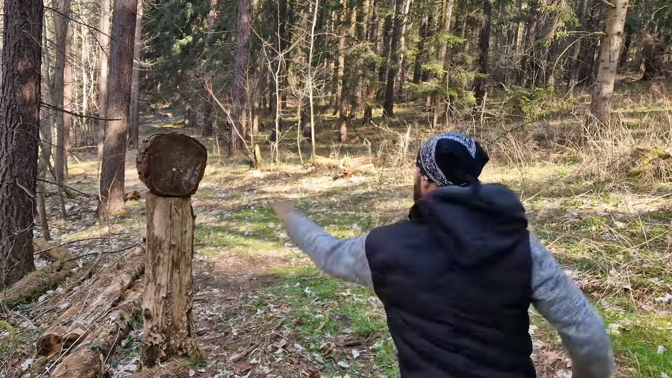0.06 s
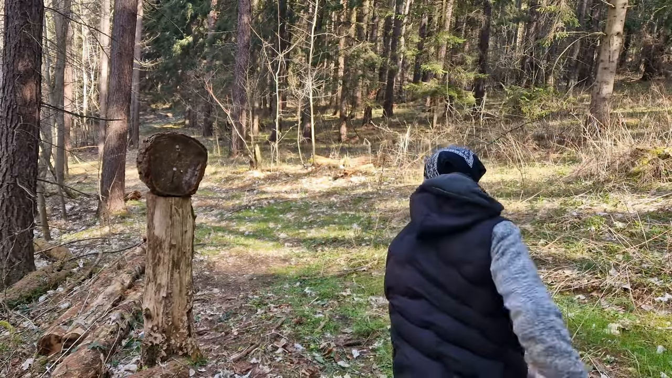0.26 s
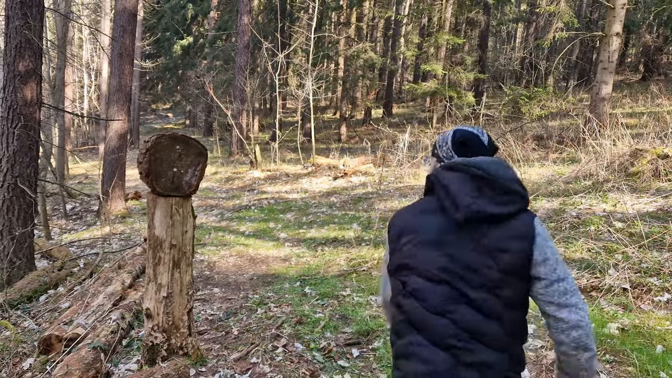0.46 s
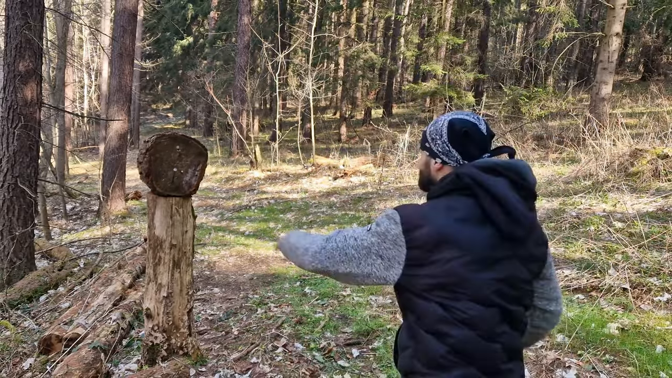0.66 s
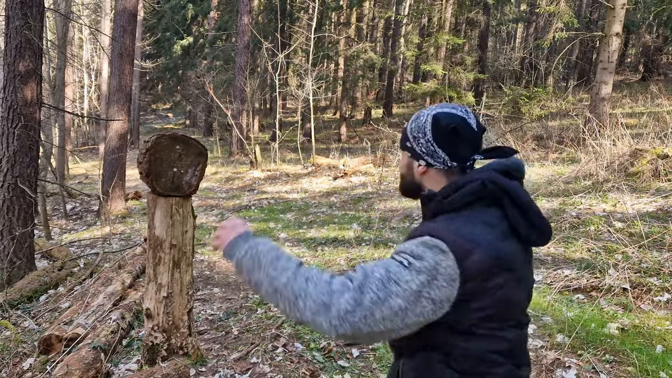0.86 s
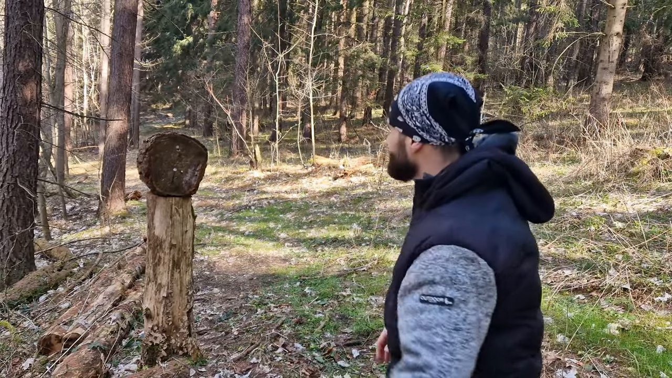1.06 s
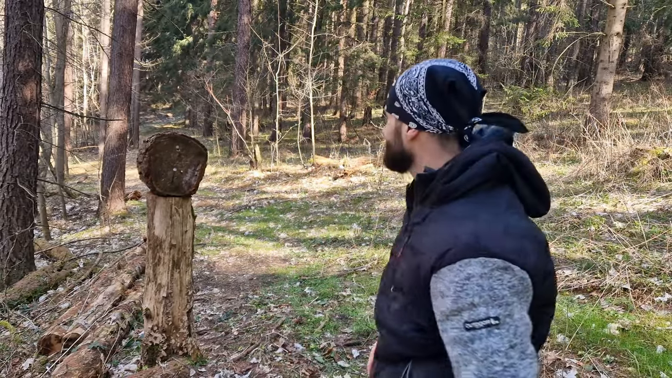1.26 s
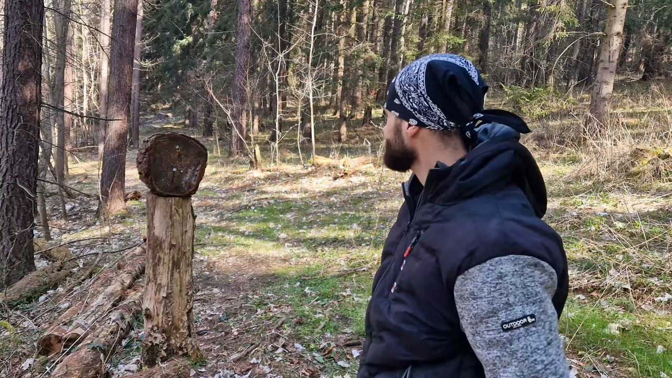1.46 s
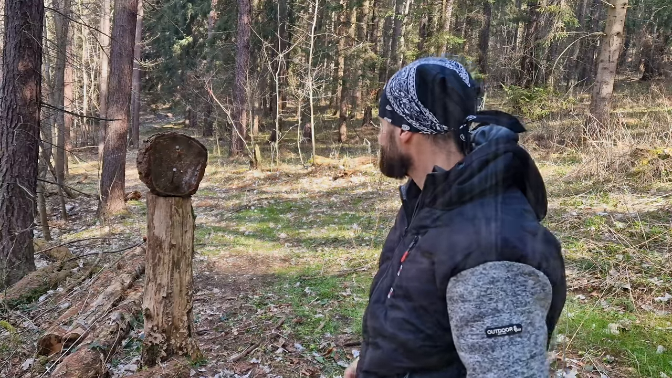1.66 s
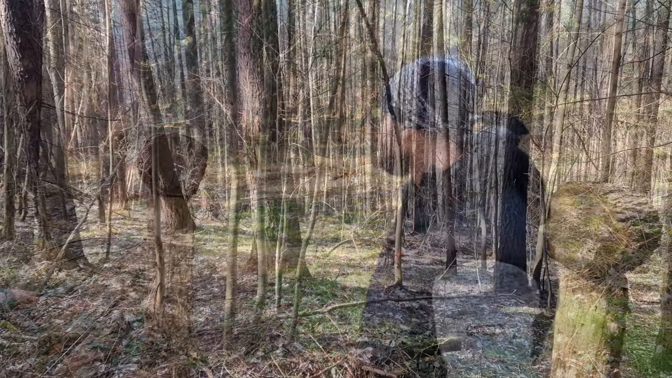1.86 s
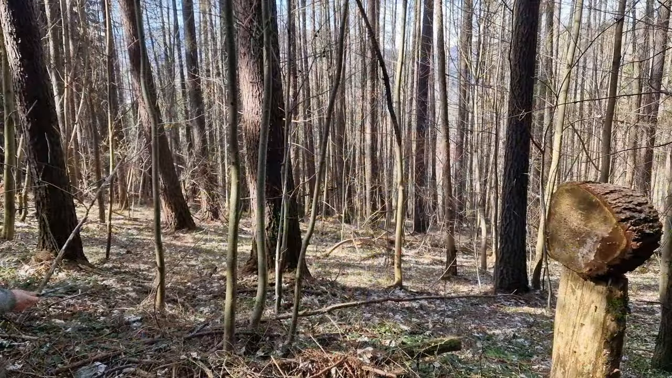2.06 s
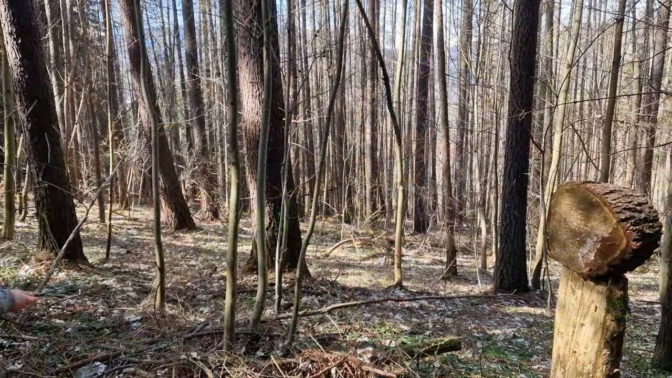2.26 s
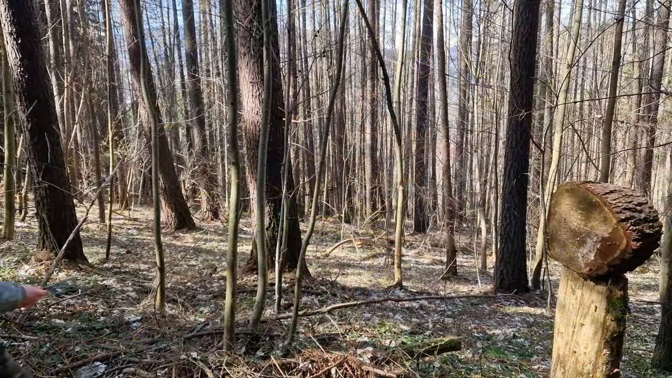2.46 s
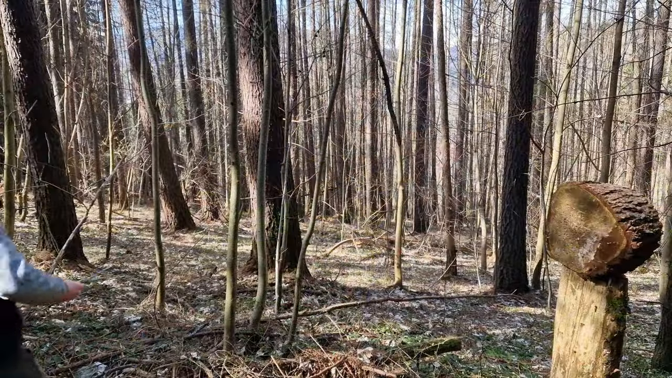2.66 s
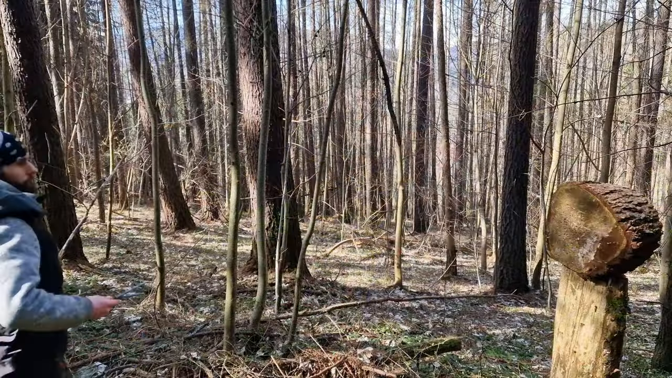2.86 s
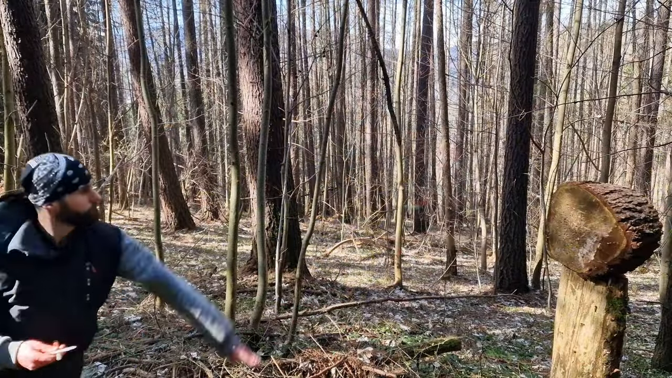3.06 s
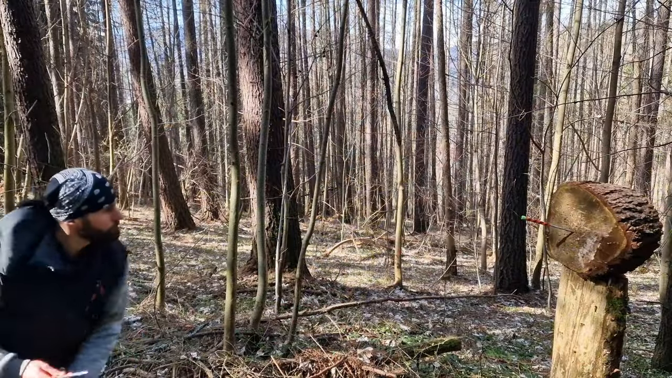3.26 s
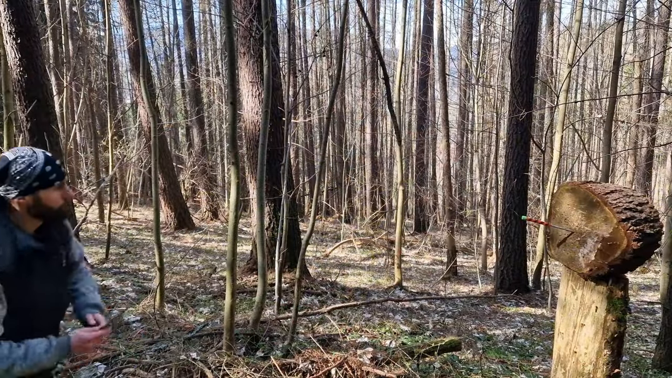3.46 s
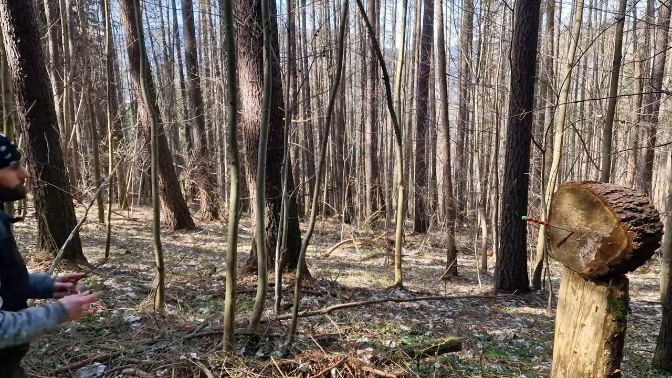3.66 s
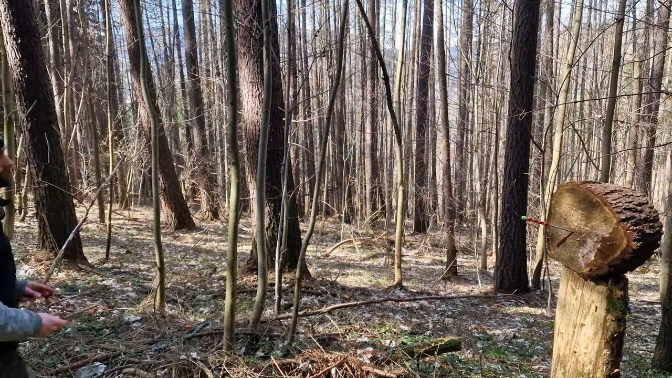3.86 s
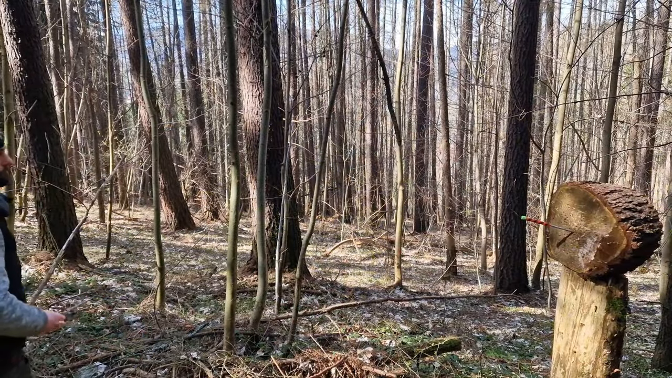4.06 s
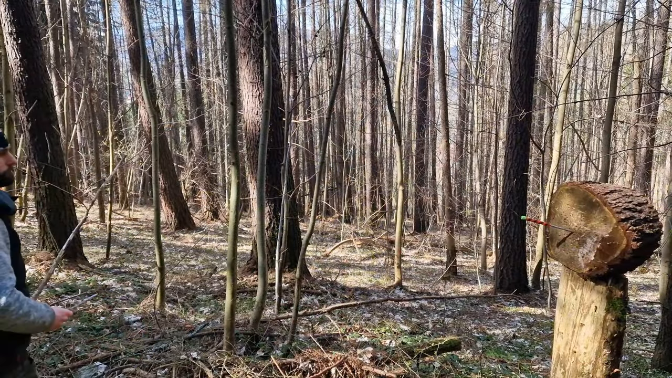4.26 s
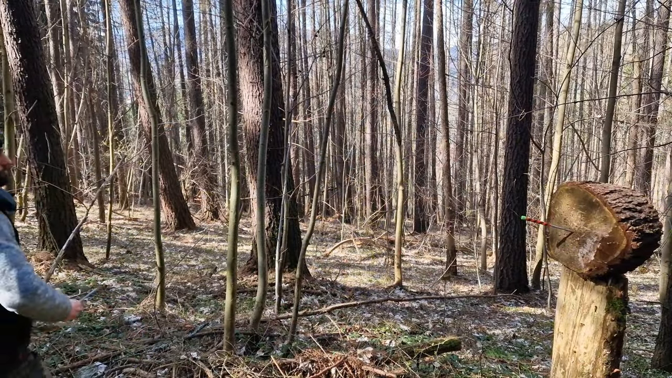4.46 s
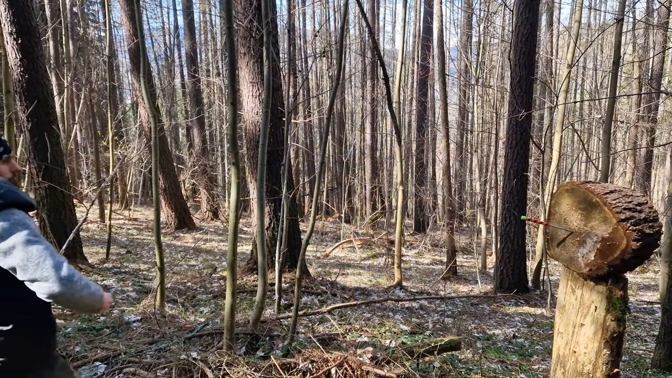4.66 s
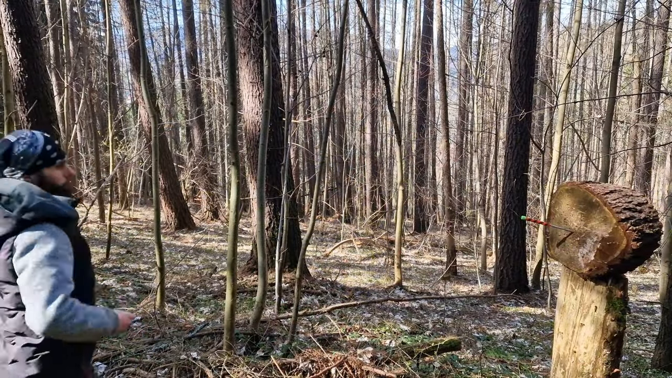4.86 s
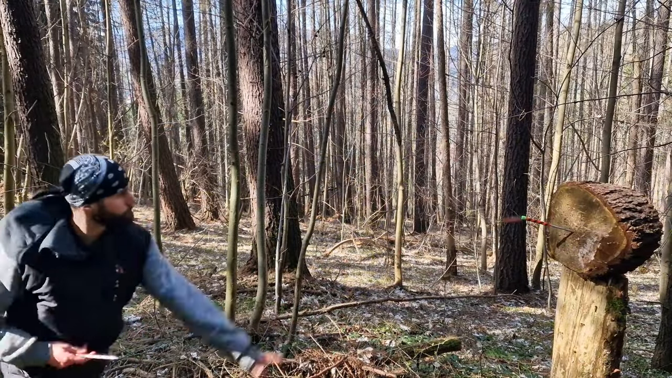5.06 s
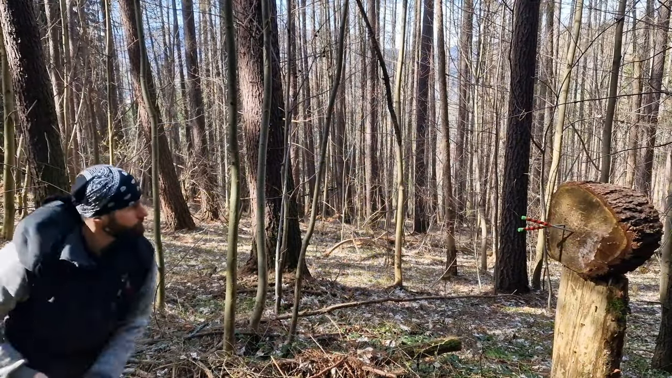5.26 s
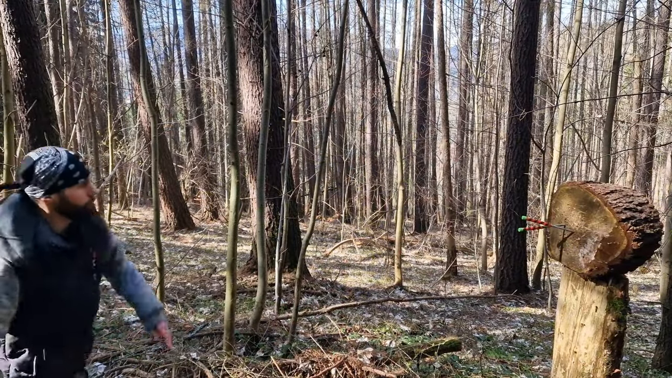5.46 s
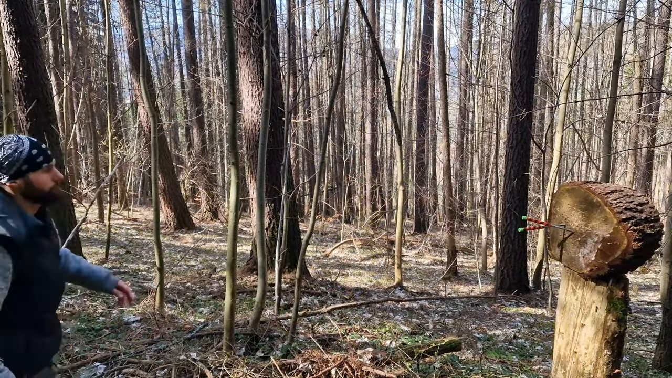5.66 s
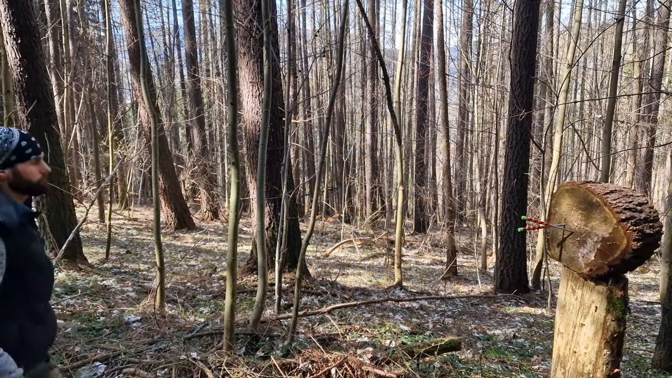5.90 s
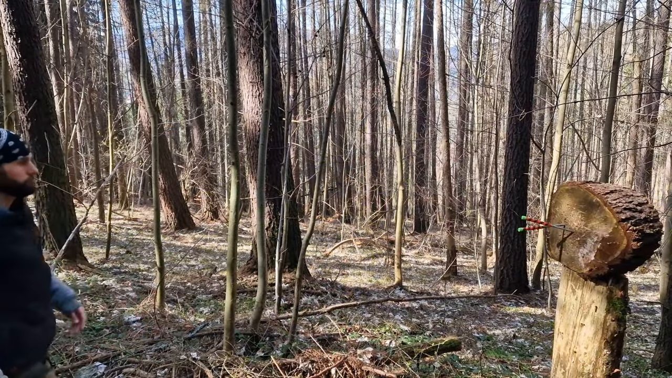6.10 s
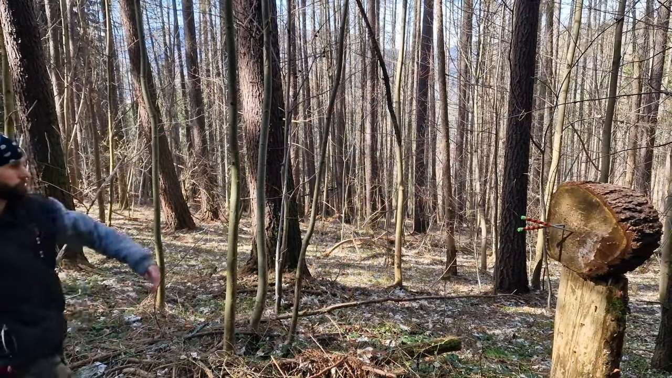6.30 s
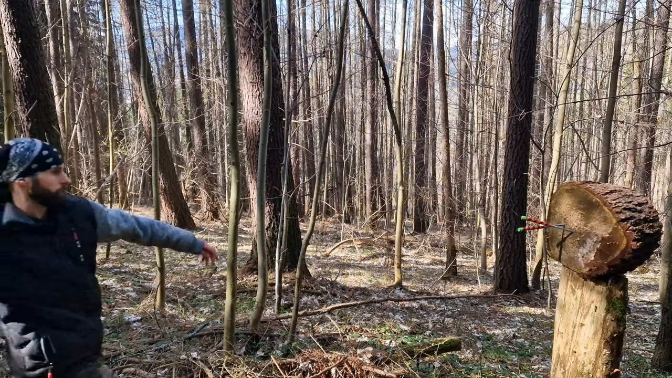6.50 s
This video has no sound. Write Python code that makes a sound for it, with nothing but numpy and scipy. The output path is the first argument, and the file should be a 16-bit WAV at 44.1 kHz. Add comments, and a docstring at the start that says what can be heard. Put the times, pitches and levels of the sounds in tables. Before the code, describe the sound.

In a quiet forest, someone close to the microphone throws three nails into a wooden target. Each lands with a crunchy thud, a tiny clink and a short echo, the first right away and the others after a pause. Between hits come rustling clothes, steps on leaves, snapping twigs and a couple of dull heel thumps. Soft wind rumble and faint, high bird calls lie underneath.

```python
"""Low wind rumbles through a forest while dry leaves stir and a far flock twitters. A thrower's padded vest
swishes, and at 0.2 s his sharpened nail bites into a log on a post: it thuds and echoes among the trunks. He
steps on leaves and twigs, and from 1.5 s small birds whistle and chirp. At 2.1 s the soft background hiss and
the high, flickering hiss drop abruptly. A second nail hits at 3.2 s and a third at 5.1 s, with two slow bird
notes between them. Near the end his heel thumps and one high call flicks up and falls back."""
import sys
import numpy as np
from scipy import signal
from scipy.fft import rfft, irfft, next_fast_len
from scipy.io import wavfile
from scipy.ndimage import uniform_filter1d, map_coordinates

SR = 44100
rng = np.random.default_rng(int(sys.argv[2]) if len(sys.argv) > 2 else 0)


def put_to_file(sound):
    """Save the sound as 16-bit audio at rate SR, in the file named by the first command-line argument."""
    columns = np.atleast_2d(sound).T  # one column per channel
    safe = np.clip(columns, -1, 1)
    whole_steps = np.round(safe * 32767)
    wavfile.write(sys.argv[1], SR, whole_steps.astype(np.int16))


N = 288149


def amp(db):
    """Turn decibels into a number to multiply by."""
    return 10 ** (np.asarray(db) / 20)

def unit(x):
    """Scale a signal to an average strength (rms) of 1."""
    return x / np.sqrt(np.mean(x ** 2) + 1e-20)

def along(points, hz):
    """Read between the rows of a (frequency, value) table, on a log scale of frequency."""
    f, v = np.transpose(points)
    return np.interp(np.log(hz + 1), np.log(f + 1), v)

def wobble(rate):
    """A smooth random curve through `rate` points a second."""
    points = rng.standard_normal(int(N * rate / SR) + 4)
    return map_coordinates(points, [np.arange(N) * rate / SR])

def filtered(x, response):
    """Scale and delay each frequency of x as `response` says."""
    n = x.shape[-1]
    m = next_fast_len(n + 8192)
    return irfft(rfft(x, m) * response(np.fft.rfftfreq(m, 1 / SR)), m)[..., :n]

def hiss(spectrum, size):
    """Noise of strength 1, as bright or dull as the spectrum says."""
    return unit(filtered(rng.standard_normal(size), lambda hz: amp(along(spectrum, hz))))

def fade(t, t60):
    """Die away by 60 dB every t60 seconds: the fade time."""
    return amp(-60 * t / t60)

def ring(t, hz, t60):
    """A fading tone that starts at t = 0."""
    t = np.maximum(t, 0)
    return np.sin(2 * np.pi * hz * t) * fade(t, t60)

def add(track, s, x):
    """Mix x into the track at s seconds."""
    i = max(0, round(s * SR))
    track[..., i:i + x.shape[-1]] += x[..., :N - i]

def placed(x, lag):
    """Stereo: the left ear hears x `lag` seconds after the right."""
    return filtered(x, lambda hz: np.exp(np.outer([-1j, 1j], np.pi * hz * lag)))

def hushed(before_db, after_db, hush_s=2.1):
    """A background level that steps down at hush_s."""
    return amp(np.where(np.arange(N) / SR < hush_s, before_db, after_db))

# how alike the two ears hear far and near sounds: f/Hz, likeness (1 = the same)
FAR_ALIKE = [(60, 0.91), (130, 0.93), (290, 0.72), (640, 0.27), (1410, -0.38), (3100, 0.19), (6820, -0.02),
             (15000, -0.31)]
NEAR_ALIKE = [(100, 1), (700, 0.36), (1400, 0.049), (3100, -0.23), (7000, -0.13)]
def rush(spectrum, alike):
    """Stereo noise of strength 1; the less alike its sides, the wider it sounds."""
    def shape(hz):
        turn = np.arccos(np.clip(along(alike, hz), -1, 1)) / 2
        return amp(along(spectrum, hz)) * [np.cos(turn), np.sin(turn)]
    mid, side = filtered(rng.standard_normal((2, N)), shape)
    return unit(np.array([mid + side, mid - side]))


# the wind's rise and fall: t/s, deep rumble level/dB, upper rumble level/dB
GUSTS = [(0.0, -61.5, -60), (0.51, -60, -64), (1.27, -61, -57.5), (2.36, -57.5, -66.5), (3.11, -52, -57.5),
         (3.67, -57, -65), (5.38, -62, -63), (5.73, -65.5, -65.5), (6.53, -57, -64)]
# the tone of its three layers: f/Hz, level/dB
DEEP_RUMBLE = [(15, -29), (30, -10), (42, -2.5), (50, 3), (62, -9), (90, -27), (200, -64), (1000, -120)]
UPPER_RUMBLE = [(30, -25.5), (60, -3), (76, 4), (105, -1.5), (135, -18.5), (300, -44.5), (1500, -120)]
TREETOPS = [(76, -41.5), (130, -12), (162, -11), (194, -15.5), (321, -7.5), (355, -10.5), (392, -3),
            (480, -12), (530, -11.5), (702, -16.5), (1230, -25), (2300, -36), (4110, -37), (5340, -44.5),
            (15800, -58.5)]
def wind(steadiness=0.22, boost_db=2, treetops_db=-66.5, gust_share=0.12):
    """Wind rumbles low and even; the treetops rush softly and swell a little with the gusts."""
    when, *levels = np.transpose(GUSTS)
    deep_db, upper_db = [np.interp(np.arange(N) / SR, when, level) for level in levels]
    deep = rush(DEEP_RUMBLE, alike=[(50, .98)])
    swell = np.sqrt(np.abs(uniform_filter1d(deep[0] ** 2, size=SR // 8)) + 1e-6)
    deep = amp(deep_db + boost_db) * unit(deep / swell ** steadiness)  # partly evens out chance swells
    upper = amp(upper_db + boost_db) * rush(UPPER_RUMBLE, alike=[(90, 0.97)])
    sway_db = gust_share * (deep_db - deep_db.mean()) + 0.85 * wobble(2)
    return deep + upper + amp(treetops_db + sway_db) * rush(TREETOPS, FAR_ALIKE)

# the tone of dry leaves on the ground: f/Hz, level/dB
LEAVES = [(150, -8.5), (400, 1), (900, -3.5), (1600, -7), (3000, -14.5), (8000, -20.5), (16000, -47)]
def stirring_leaves():
    """Dry leaves stir all around as a soft hiss; at 2.1 s the background level drops abruptly."""
    return hushed(before_db=-70.5, after_db=-92) * rush(LEAVES, FAR_ALIKE)

# the tone of many far birds together: f/Hz, level/dB
TWITTER = [(1500, -34.5), (3000, -3), (4400, -1.5), (6300, -6), (7500, 3.5), (8600, -16), (14000, -17)]
def flock():
    """Far twittering blurs into a high, flickering hiss; at 2.1 s the background level drops abruptly."""
    return hushed(before_db=-86, after_db=-99) * amp(1.6 * wobble(20)) * rush(TWITTER, FAR_ALIKE)

# throws, when the arm is fastest: t/s, half-length/s, air level/dB, cloth level/dB, leaf level/dB
THROWS = [(0.025, 0.087, -56, -51, -43.5), (3.057, 0.065, -55, -66, -56), (5.056, 0.044, -52, -63, -58)]
# steps and turns: t/s, hold/s, cloth level/dB, leaf level/dB
STEPS = [(0.36, 0.012, -60, -55.5), (0.54, 0.27, -71, -64.5), (0.893, 0.036, -64.5, -63),
         (1.192, 0.068, -60, -62), (1.309, 0.2, -67, -72), (1.75, 0.021, -74.5, -73),
         (2.496, 0.17, -69.5, -79), (2.793, 0.042, -80, -69), (3.4, 0.017, -74.5, -64),
         (3.754, 0.046, -74.5, -63), (4.755, 0.058, -75, -75.5), (5.732, 0.045, -87.5, -64),
         (6.383, 0.15, -77.5, -74.5)]
def motion(wind_up_db_per_s=137, settle_db_per_s=92.5, lurch_after_s=0.23, lurch_width_s=0.051,
           step_rise_s=0.029, step_fall_s=0.046):
    """How strongly the thrower moves air, cloth and leaves at each moment."""
    t = np.arange(N) / SR
    air, cloth, leaves = np.zeros((3, N))
    for s, width, air_db, cloth_db, leaf_db in THROWS:
        arm = np.exp(-((t - s) / width) ** 2 / 2)
        # his body turns with the arm, then he lurches forward
        body = amp(-np.maximum(wind_up_db_per_s * (s - t), settle_db_per_s * (t - s)))
        lurch = np.exp(-((t - s - lurch_after_s) / lurch_width_s) ** 2 / 2)
        air += amp(air_db) * arm
        cloth += amp(cloth_db) * (arm + amp(-3) * body) + amp(-70) * lurch
        leaves += amp(leaf_db) * body + amp(-63) * lurch
    for s, hold, cloth_db, leaf_db in STEPS:
        step = np.exp(np.minimum(t - s, 0) / step_rise_s - np.maximum(t - s - hold, 0) / step_fall_s)
        cloth = np.hypot(cloth, amp(cloth_db) * step)
        leaves = np.hypot(leaves, amp(leaf_db) * step)
    return air, cloth, leaves

def crackle(rate, t60, scatter_db=4.5):
    """Tiny random jumps in loudness, about `rate` a second, that each fade quickly."""
    moments = rng.random(N) < rate / SR
    sizes = amp(scatter_db * np.clip(rng.standard_normal(N), -2, 2))
    return unit(signal.lfilter([1], [1, -fade(1 / SR, t60)], moments * sizes))

# the tone of the padded vest rubbing: f/Hz, level/dB
CLOTH = [(710, -37.5), (1200, -9), (2130, -14.5), (3000, -6), (3200, -3.5), (6890, -7.5), (14800, -9.5),
         (15800, -16)]
# the tone of air pushed by the arm: f/Hz, level/dB
AIR = [(40, -13), (170, 0), (400, -1.5), (900, -16), (1700, -24.5), (4000, -45), (12000, -81.5)]
def thrower(crinkle_db=2.0, creases_db=-14, snaps_db=-12):
    """Cloth rubs and creases, leaves shift and snap as he moves; each swing of the arm pushes air."""
    air, cloth, leaves = motion()
    creases = amp(creases_db) * crackle(rate=36, t60=.008)
    snaps = amp(snaps_db) * crackle(rate=14, t60=0.026)
    rubbing = rush(CLOTH, NEAR_ALIKE) * (amp(crinkle_db * wobble(500) + 1.3 * wobble(38)) + creases)
    rustling = rush(LEAVES, NEAR_ALIKE) * (amp(1.5 * wobble(120)) + snaps)
    return cloth * unit(rubbing) + leaves * unit(rustling) + air * rush(AIR, NEAR_ALIKE)

# the loudest twigs: t/s, level/dB, f/Hz
TWIGS = [(0.133, -38.5, 870), (0.32, -33.5, 1404), (0.362, -44, 890), (0.424, -43.5, 1440),
         (0.629, -46, 1320), (0.87, -46.5, 1090), (1.153, -47.5, 1090), (1.184, -43, 730),
         (1.286, -36.5, 860), (1.293, -40, 1070), (1.788, -45, 815), (2.603, -41, 616), (2.652, -50, 790),
         (2.712, -51, 664), (2.799, -49, 1060), (5.561, -54, 1313)]
def twigs(gain_db=-7, t60=.026):
    """Twigs crack underfoot, each a dull burst of noise around one pitch."""
    out = np.zeros(N)
    t = np.arange(SR // 8) / SR
    for s, db, hz in TWIGS:
        tone = [(hz / 4, -22), (hz * 0.46, -4), (hz, 0), (hz * 1.1, -4), (hz * 2, -19), (hz * 12, -40)]
        add(out, s, amp(db + gain_db) * hiss(tone, len(t)) * fade(t, t60))
    return out

# how long the echo lasts among the trunks: f/Hz, fade time/s
ECHO_FADE = [(100, 0.45), (400, 0.39), (1200, 0.72), (3000, 0.9), (12000, 0.16)]
def forest(x, near_db, far_db, near_t60=0.13):
    """Undergrowth scatters the sound at once; trunks send back a longer, grainy echo."""
    t = np.arange(SR) / SR
    grains = rng.standard_normal((2, SR)) * amp(9 * rng.standard_normal(SR))
    # each band of frequencies gets its own fade time and stereo width
    hz, when, bands = signal.stft(grains, SR, nperseg=256)
    turn = np.arccos(np.clip(along(FAR_ALIKE, hz), -1, 1))[:, None] / 2
    bands = bands * fade(when, along(ECHO_FADE, hz)[:, None]) * [np.cos(turn), np.sin(turn)]
    mid, side = signal.istft(bands, SR, nperseg=256)[1][:, :SR]
    far = np.array([mid + side, mid - side]) * (1 - np.exp(-(t / 0.0023) ** 2))
    near = far * fade(t, near_t60)
    tail = amp(near_db) * near / np.linalg.norm(near[0]) + amp(far_db) * far / np.linalg.norm(far[0])
    return signal.fftconvolve(x[None], tail, axes=1)

def bounce(hz, db, delay_s, cut_hz):
    """The filter for one reflection: later, quieter and duller."""
    return amp(db) * np.exp(-2j * np.pi * hz * delay_s) / (1 + (hz / cut_hz) ** 2)

# nail hits: t/s, thud level/dB, bite level/dB, splinter level/dB, ground echo delay/s,
# ground echo level/dB, nearest trunk's echo level/dB, forest echo level/dB
STRIKES = [(0.1865, -15, -30.5, -24.5, 0.0034, -11, -65, -19.5),
           (3.1595, -17.5, -35.5, -33, 0.0043, -9, -13.5, -21.5),
           (5.1324, -16.5, -29.5, -24.5, 0.004424, -5, -15, -19)]
# the tone of wood fibres parting, and of splintering: f/Hz, level/dB
BITE = [(300, -11), (1400, -1), (2100, -6.5), (2900, -2), (4200, 0), (6500, -6.5), (8000, -4.5),
        (10000, -4.5), (15500, -13)]
SPLINTER = [(200, -1), (900, 3), (1500, -3.5), (2000, -7.5), (2700, -6.5), (3800, 0.5), (6000, -11.5),
            (10000, -15.5), (15500, -23.5)]
# the clink of the point going in, one list per hit: f/Hz, level/dB
CLINKS = [
    [(3580, -23.5), (4215, -18), (5205, -22.5), (7500, -28)],
    [(2570, -31.5), (3260, -18), (3800, -20), (5560, -29)],
    [(2650, -34.5), (3746, -19.5), (5500, -31.5), (7790, -35)],
]
# the tones of the log on its post: f/Hz, level/dB, fade time/s
LOG_TONES = [(88, -32.5, 0.046), (182, -15.5, 0.047), (280, -5.5, .024), (408.8, -7.5, 0.038),
             (525, -8.5, 0.016), (770, -16, 0.011), (1050, -23.5, 0.011), (1350, -14, 0.018)]
# the stuck nail and the wood gripping it, one list per hit: f/Hz, level/dB, fade time/s
NAIL_TONES = [
    [(573, -22.5, 0.012), (880, -38.5, 0.024), (1410, -40.5, 0.035), (2294, -34.5, 0.12)],
    [(1010, -22, 0.055), (1010, -26.5, 0.016), (1248, -29.5, 0.082), (1462, -24, 0.032), (1540, -28, 0.014)],
    [(735, -25.5, .03), (1020, -31, 0.0237), (1196, -19.5, 0.028), (2100, -31, 0.016)],
]
def nail_strikes(bite_s=.0019, sink_s=.009, sink_db=-10, spray_db=-6):
    """The point crunches into the fibres and sinks in; as it stops, the log thuds, the nail shivers."""
    out = np.zeros((2, N))
    t = np.arange(SR // 4) / SR
    ring_after_stop = lambda tones: sum(amp(db) * ring(t - bite_s, hz, t60) for hz, db, t60 in tones)
    for strike, nail_tones, clinks, side in zip(STRIKES, NAIL_TONES, CLINKS, (-1, 1, 1)):
        s, thud_db, bite_db, splinter_db, ground_s, ground_db, trunk_db, forest_db = strike
        entering = np.exp(-(t / bite_s) ** 4) + amp(sink_db) * np.exp(-(t / sink_s) ** 4)
        bite = amp(bite_db) * hiss(BITE, len(t)) * entering
        clink = sum(amp(db) * ring(t, hz, t60=0.013) for hz, db in clinks)
        splinter = amp(splinter_db) * hiss(SPLINTER, len(t)) * fade(t, t60=0.03)
        # the face of the log is first pushed away, then swings back and rings
        push = -.45 * np.sin(np.pi * np.minimum(t / bite_s, 1))
        thud = amp(thud_db) * (push + ring_after_stop(LOG_TONES))
        body = splinter + thud + ring_after_stop(nail_tones)
        # the soft ground and the nearest trunk send back dull copies
        paths = lambda hz: (1 + bounce(hz, ground_db, ground_s, cut_hz=4500)
                            + bounce(hz, trunk_db, delay_s=0.0089, cut_hz=980))
        add(out, s - bite_s, placed(filtered(bite + clink + body, paths), lag=side * .00014))
        # rough bark smears the crunch into a spray on its way into the forest
        spray = amp(bite_db + spray_db) * hiss(BITE, len(t)) * fade(t, t60=0.068)
        add(out, s - bite_s, forest(body + spray, near_db=-12.0, far_db=forest_db))
    return out

# the sharpest ticks: t/s, level/dB
TICKS = [(0.717, -51), (0.967, -54), (1.35, -45.5), (1.422, -53), (2.65, -45.5), (3.052, -40.5),
         (3.066, -39), (3.423, -44.5), (4.792, -46.5), (5.032, -42), (5.047, -35)]
def ticks(gain_db=-4, t60=0.023):
    """Cloth and the nails in his hand tick in short, bright bursts of noise."""
    out = np.zeros(N)
    t = np.arange(SR // 8) / SR
    tone = [(800, -5.5), (3000, -5.0), (7000, 9), (12000, -0.5), (15000, -4.5)]  # f/Hz, level/dB
    for s, db in TICKS:
        add(out, s, amp(db + gain_db) * hiss(tone, len(t)) * fade(t, t60))
    return out

# one bird's thin, high whistles: t/s, length/s, level/dB
WHISTLES = [(1.524, 0.031, -75), (1.837, 0.022, -80), (1.966, 0.038, -91), (2.36, 0.23, -77.5)]
# another's raspy, rising chirps: t/s, level/dB
CHIRPS = [(1.694, -73.5), (1.846, -75), (1.958, -73.5), (3.278, -70)]
# a distant one's slow, sliding notes: t/s, start f/Hz, end f/Hz, level/dB
SLIDES = [(4.232, 4170, 3960, -90.5), (4.775, 2286, 3210, -85.5)]
# one call that flicks up and falls back: t/s into the call, f/Hz
FLICK = [(0, 7280), (0.033, 7830), (.046, 9500), (.066, 7370)]
def birds(whistle_hz=7400, sag_hz_per_s=1400, stray_count=60, stray_hz=4770, stray_s=0.046):
    """Small birds sing gliding, trembling tones, which the trees smear."""
    pure, rough, raspy = 0.0045, 0.028, 0.07  # how much a note trembles, as a share of its pitch
    # a note is: start, level, tremble, path of its pitch
    notes = [(s, db, pure, [(0, whistle_hz), (held, whistle_hz - sag_hz_per_s * held)])
             for s, held, db in WHISTLES]
    notes += [(s, db, raspy, [(0, 3450), (0.03, 4750)]) for s, db in CHIRPS]
    notes += [(s, db, rough, [(0, start_hz), (0.16, end_hz)]) for s, start_hz, end_hz, db in SLIDES]
    notes += [(5.829, -72, pure, FLICK)]
    # faint stray notes from deep in the wood, at any time
    strays = rng.uniform([0, -1, -1, -1], [N / SR - stray_s, 1, 1, 1], (stray_count, 4))
    for s, pitch, glide, loudness in strays:
        hz = stray_hz * 2 ** (0.76 * pitch)
        notes.append((s, -96 + 3 * loudness, rough, [(0, hz), (stray_s, hz * 2 ** (0.098 * glide))]))
    song, flutter = np.zeros(N), wobble(680)
    for s, db, tremble, path in notes:
        when, pitch = np.transpose(path)
        t = np.arange(int(when[-1] * SR)) / SR
        hz = np.interp(t, when, pitch) * (1 + tremble * flutter[:len(t)])
        swell = np.sqrt(np.abs(np.sin(np.pi * t / when[-1])))
        add(song, s, amp(db) * swell * np.sin(2 * np.pi * np.cumsum(hz) / SR))
    song *= amp(3.8 * wobble(170))  # the loudness flickers too
    return amp(-9) * song + forest(song, near_db=3.5, far_db=-8)[:, :N]

# heel thumps: t/s, level/dB, f/Hz
HEELS = [(3.076, -36, 165), (5.755, -36, 191)]
def heels(gain_db=7.0, rise_s=0.0027):
    """A heel lands on hollow soil, which rings low and briefly."""
    out = np.zeros(N)
    t = np.arange(SR // 8) / SR
    for s, db, hz in HEELS:
        add(out, s, amp(db + gain_db) * ring(t, hz, t60=.04) * (1 - np.exp(-t / rise_s)))
    return out


def scene():
    """The log and the thrower close by, with birds, wind and leaves all around."""
    nearby = nail_strikes() + thrower()
    small_sounds = twigs() + ticks() + heels()
    nearby += placed(small_sounds, lag=-0.000074)
    nearby += forest(small_sounds, near_db=-14.5, far_db=-25.5)[:, :N]
    lean_left = amp([[.3], [-.3]])
    return nearby * lean_left + birds() + flock() + wind() + stirring_leaves()

def record(dry, top_hz=15850):
    """Cut away the very highest treble, above top_hz."""
    return filtered(dry, lambda hz: 1 / (1 + (hz / top_hz) ** 160))


dry = scene()
out = record(dry)
put_to_file(out)
```